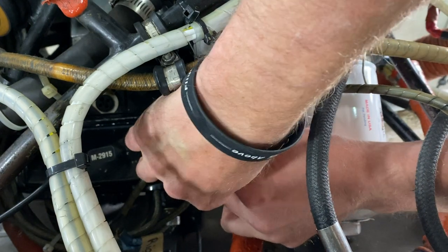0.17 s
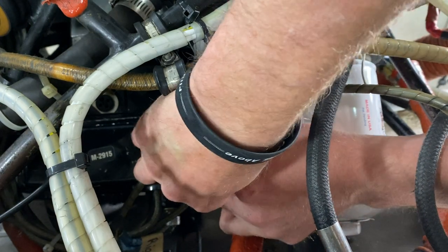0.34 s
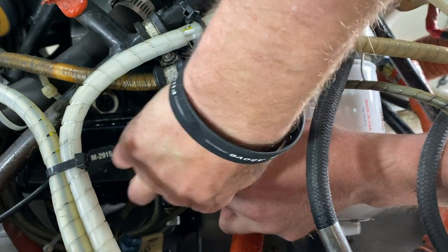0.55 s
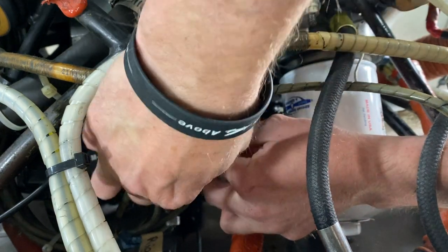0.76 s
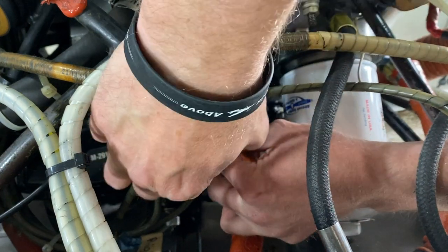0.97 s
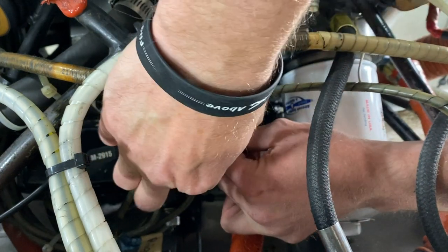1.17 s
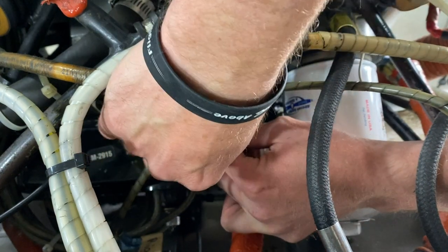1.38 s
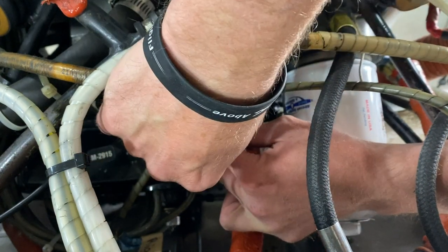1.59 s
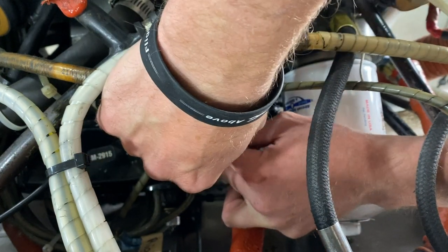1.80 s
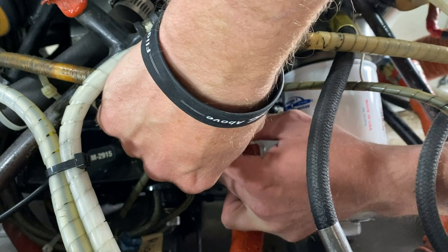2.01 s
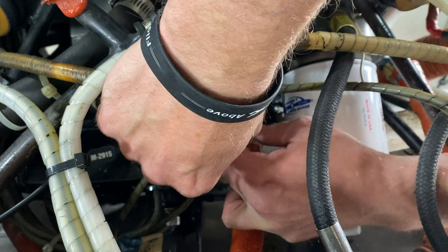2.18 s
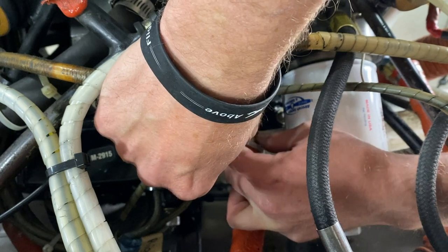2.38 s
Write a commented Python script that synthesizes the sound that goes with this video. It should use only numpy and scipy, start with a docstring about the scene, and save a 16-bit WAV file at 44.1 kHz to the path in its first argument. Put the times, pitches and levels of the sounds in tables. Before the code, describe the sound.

Zip tie pulled tight with a rapid rasp of sharp clicks, followed by soft handling sounds

```python
"""A nylon zip tie is pulled tight around a hose in an engine bay, close by, in a hangar.
Its pawl clicks over the teeth in a quick jerk, a slow stretch and a fast run: noise cracks plus ringing modes.
Fingers rub (dense random grains), tick on the plastic (cracks with a short ring), scuff (fading noise)
and knock softly on the hoses (band-passed modes). Low filtered noise and faint reverberation lie behind."""
import sys
import numpy as np
from scipy import signal
from scipy.fft import rfft, irfft, next_fast_len
from scipy.io import wavfile
from scipy.ndimage import uniform_filter1d

SR = 44100
rng = np.random.default_rng(int(sys.argv[2]) if len(sys.argv) > 2 else 0)


def store_pcm(level_fs):
    """Save levels as 16-bit WAV."""
    pcm = np.round(np.clip(level_fs, -1, 1) * 32767).astype(np.int16)
    wavfile.write(sys.argv[1], SR, np.atleast_2d(pcm).T)


N = 108045
TIME_S = np.arange(N) / SR


def from_db(db):
    """Decibels to gain."""
    return 10 ** (np.asarray(db) / 20)


def rms_one(x):
    """Scale to rms 1."""
    return x / np.sqrt(np.mean(x ** 2) + 1e-20)


def curve(rows, time_s, column=1):
    """One column of a time table, interpolated at time_s."""
    rows = np.array(rows)
    return np.interp(time_s, rows[:, 0], rows[:, column])


def colour(x, points):
    """Causal (minimum-phase) filter with the given spectrum, interpolated over log frequency."""
    size = 2 * next_fast_len(len(x))
    freq_hz, level_db = np.transpose(points)
    grid_hz = np.maximum(np.arange(size // 2 + 1) * SR / size, 1)
    gain = from_db(np.interp(np.log(grid_hz), np.log(freq_hz), level_db))
    # fold the cepstrum onto positive time
    cepstrum = irfft(np.log(gain))
    cepstrum[1:size // 2] *= 2
    cepstrum[size // 2 + 1:] = 0
    response = np.exp(rfft(cepstrum))
    return irfft(rfft(x, size) * response)[:len(x)]


def low_pass(x, cutoff_hz):
    """Second-order low-pass."""
    return signal.sosfilt(signal.butter(2, cutoff_hz, fs=SR, output="sos"), x)


def add(out, start_s, sound):
    """Mix a sound in at start_s."""
    start = int(start_s * SR)
    out[start:start + len(sound)] += sound[:max(N - start, 0)]


def dying_noise(t60_s, size=3000):
    """Dense reflections: exponential fade, flattened spectrum, taper to zero; energy 1."""
    fade = from_db(-60 * np.arange(size) / SR / t60_s)
    spectrum = rfft(rng.standard_normal(size) * fade)
    smooth_power = uniform_filter1d(np.abs(spectrum) ** 2, size=size // 70)
    flat = irfft(spectrum / np.sqrt(smooth_power + 1e-12), size)
    tail = flat * np.linspace(1, 0, size) ** 2
    return tail / np.linalg.norm(tail)


def ring(modes, spread_db, size=9000):
    """One blow on decaying sine modes of alternating sign, each level varied by chance."""
    t = np.arange(size) / SR
    out = np.zeros(size)
    for k, (freq_hz, level_db, t60_s) in enumerate(modes):
        fade = from_db(level_db + spread_db * rng.standard_normal() - 60 * t / t60_s)
        out += (-1) ** k * fade * np.sin(2 * np.pi * freq_hz * t)
    return out


AIR_RMS_DB = -58.5
# background spectrum density: freq_hz, level_db (relative, per Hz)
AIR_SPECTRUM = [(20, 5), (40, 1.5), (70, -4), (120, -12.5), (180, -11), (280, -19), (450, -24.5),
                (640, -16.5), (900, -28), (2000, -47.5), (6000, -41.5), (15000, -40.5)]


def hangar_air():
    """Steady low rumble: noise shaped by the background spectrum."""
    return from_db(AIR_RMS_DB) * rms_one(colour(rng.standard_normal(N), AIR_SPECTRUM))


HALL_T60_S, HALL_BASS_T60_S = 0.37, 0.8
# hangar return: freq_hz, level_db
HALL_SPECTRUM = [(100, -33.5), (165, -13.5), (200, -15.5), (260, -13), (1000, -18.5), (4000, -19.5),
                 (13000, -26.5)]


def hangar_reverb(x):
    """Faint diffuse return; the bass decays more slowly than the treble."""
    full = dying_noise(HALL_T60_S, size=SR)
    treble = full - low_pass(full, 370.4)
    bass = low_pass(dying_noise(HALL_BASS_T60_S, size=SR), 400)
    return signal.fftconvolve(x, colour(treble + bass, HALL_SPECTRUM))[:N]


GRAINS_PER_S, GRAIN_SPREAD_DB = 2500, 1.5
FLUTTER_RMS_DB, FLUTTER_CUTOFF_HZ = 2, 26.12
CATCHES_PER_S, CATCH_DB, CATCH_SPREAD_DB = 45, 22.5, 2.5   # impulse level before colouring and rub level
# fingers sliding on the strap: time_s, level_db
RUB_LEVEL = [(0, -66.5), (.2, -60.5), (.8, -68), (.93, -67.5), (1.05, -65), (1.2, -66), (1.35, -65.5),
             (1.52, -68), (1.58, -72.5), (1.8, -72.5), (1.88, -74), (1.97, -74), (2.15, -73.5),
             (2.27, -68.5), (2.45, -69.5)]
# slip grain spectrum: freq_hz, level_db (relative)
RUB_SPECTRUM = [(400, 9), (900, -1.5), (1500, 7), (2200, 2.5), (3100, 5), (5000, -4), (9000, -10.5),
                (15000, -23.5)]


def rubbing():
    """Skin slips on the strap in fine random grains and at times catches with a faint tick."""
    born = rng.random(N) < GRAINS_PER_S / SR
    grain_db = GRAIN_SPREAD_DB * np.minimum(rng.exponential(1, N), 5)
    grains = born * rng.choice([-1, 1], N) * from_db(grain_db)
    flutter = rms_one(low_pass(rng.standard_normal(N), FLUTTER_CUTOFF_HZ))
    caught = rng.random(N) < CATCHES_PER_S / SR
    catches = caught * from_db(CATCH_DB + CATCH_SPREAD_DB * rng.uniform(-1.3, 1, N))
    slip = rms_one(colour(grains, RUB_SPECTRUM)) + colour(catches, TICK_SPECTRUM)
    return slip * from_db(curve(RUB_LEVEL, TIME_S) + FLUTTER_RMS_DB * flutter)


# skin scuffs across a hose: start_s, level_db, t60_s
SCUFF_EVENTS = [(0.129, -23, 0.082), (1.863, -26, 0.083), (1.873, -24.5, 0.055), (1.883, -18.5, 0.12)]
# scuff spectrum: freq_hz, level_db
SCUFF_SPECTRUM = [(30, 16), (70, 19), (130, 3.5), (400, 14.5), (1100, -3), (2000, -9.5), (4000, -14),
                  (9000, -18.5), (15000, -22.5)]


def scuffs():
    """Skin friction as short broad bursts of fading noise with a soft low push."""
    out = np.zeros(N)
    for start_s, level_db, t60_s in SCUFF_EVENTS:
        add(out, start_s, from_db(level_db) * dying_noise(t60_s))
    return colour(out, SCUFF_SPECTRUM)


BAND_RATIO = 1.47   # favoured pitch to each band edge
SLIDE_SHARE, SKIN_CUTOFF_HZ = 0.73, 900   # energy share of the push that slides; soft skin dulls the contact
# knuckles on the hoses: start_s, level_db, favoured_hz, slide_t60_s
BUMP_EVENTS = [(.131, -35, 340, 0.026), (0.148, -5.5, 272, 0.0088), (0.514, 8.5, 167, 0.011),
               (1.141, -5, 688, 0.06), (1.169, -12, 400, 0.047), (1.247, -9.5, 190, 0.043),
               (1.318, -14, 620, 0.044), (1.337, -9, 206, 0.043), (1.445, -10, 400, 0.11),
               (1.612, -7, 642, 0.042), (1.8392, 8, 400, 0.005), (1.886, -1, 228, 0.011),
               (1.895, -5.5, 435, 0.047), (1.915, -11, 700, .04), (2.249, -5.5, 670, 0.045),
               (2.348, -11, 172, .04)]
# hose modes: freq_hz, level_db, t60_s
HOSE_MODES = [(181.4, -40, 0.1), (282, -46.5, .05), (399, -44.5, 0.031), (523, -43.5, 0.02),
              (585, -44, 0.066), (672, -41.5, 0.055), (1096, -57.5, 0.017)]


def bumps():
    """Soft contacts push and slide, ringing the hoses briefly, each favouring one band of modes."""
    out = np.zeros(N)
    for start_s, level_db, favoured_hz, t60_s in BUMP_EVENTS:
        push = np.sqrt(SLIDE_SHARE) * dying_noise(t60_s)
        push[0] += np.sqrt(1 - SLIDE_SHARE)
        hose = signal.fftconvolve(push, ring(HOSE_MODES, spread_db=2.5))
        band_hz = [favoured_hz / BAND_RATIO, favoured_hz * BAND_RATIO]
        contact = signal.butter(1, band_hz, "band", fs=SR, output="sos")
        add(out, start_s, from_db(level_db) * signal.sosfilt(contact, hose))
    return low_pass(out, SKIN_CUTOFF_HZ)


TICK_DB, TICK_T60_S, TICK_DIRECT_DB = -21.5, 0.015, 4.5
TICK_RING_DB, TICK_RING_T60_S = -13.5, 0.0054
# ticks of the plastic tail: start_s, level_db, ring_hz, cutoff_hz
TICK_EVENTS = [(0.068, -16.5, 9300, 11700), (0.1552, -17, 5300, 9000), (.2000, -9, 3030, 8850),
               (1.023, -22.5, 8500, 11000), (1.2239, -2.5, 5490, 6200), (1.236, -24, 5000, 9000),
               (1.288, -7, 3580, 7650), (1.3080, -14, 3600, 8800), (1.351, -9.5, 2800, 7400),
               (1.5236, -2.5, 3290, 13700), (1.539, -19, 5030, 10000), (2.0679, -6.5, 4430, 8100),
               (2.2693, -15, 3150, 12000), (2.346, -16.5, 7040, 13000), (2.4437, -13.5, 3350, 9800)]
# tick spectrum: freq_hz, level_db
TICK_SPECTRUM = [(600, -26), (1000, -18.5), (1500, 0.5), (2300, -8), (3100, 1), (4500, -3), (6000, -2.5),
                 (8200, -0.5), (10500, -9), (15000, -16)]


def ticks():
    """Nylon on fingernails and fittings: a crack, a very short ring and a little scatter."""
    out = np.zeros(N)
    for start_s, level_db, ring_hz, cutoff_hz in TICK_EVENTS:
        mode = (ring_hz, TICK_RING_DB, TICK_RING_T60_S)
        click = dying_noise(TICK_T60_S) + ring([mode], spread_db=3, size=3000)
        click[0] += from_db(TICK_DIRECT_DB)
        add(out, start_s, from_db(TICK_DB + level_db) * low_pass(click, cutoff_hz))
    return colour(out, TICK_SPECTRUM)


TOOTH_CHANGE = 0.65   # energy share of the scatter that differs from tooth to tooth


def tooth_clicks(times_s, levels_db, t60_s, direct_db):
    """Each tooth gives a sharp crack, then scatter off the engine parts, partly alike each time."""
    out = np.zeros(N)
    shared = dying_noise(t60_s)
    for start_s, level_db in zip(times_s, levels_db):
        click = np.sqrt(1 - TOOTH_CHANGE) * shared + np.sqrt(TOOTH_CHANGE) * dying_noise(t60_s)
        click[0] += from_db(direct_db)
        add(out, start_s, from_db(level_db) * click)
    return out


SNAP_DB, SNAP_T60_S, SNAP_DIRECT_DB = 2, 0.025, -5.5
CLACK_DB, CLACK_T60_S, CLACK_DIRECT_DB = -15.5, 0.043, -13.5
PAWL_HZ, PAWL_T60_S = 14000, .0025
TOOTH_SPREAD_DB, MODE_SPREAD_DB = -0.73, 3.55   # factors on a normal draw
# strap drawn through the head: time_s, teeth_passed
STRAP_TRAVEL = [(0.2386, 0), (0.2657, 9), (0.2728, 10), (0.2861, 11), (0.3116, 14), (0.3548, 17),
                (0.3659, 18), (0.4286, 22), (0.4569, 24), (0.4806, 26), (0.5516, 33), (0.6069, 37),
                (0.6367, 41), (0.6582, 45), (0.697, 53), (0.7138, 56), (0.7287, 58), (0.7502, 60)]
# tooth strength: time_s, snap_db, clack_db, hum_db, knock_db, twang_db
TOOTH_STRENGTH = [(.238, 2, 7, 6.5, -3, -14), (.257, -5.5, -5, -6, -1.5, -12), (.278, 0, 2.5, 6.5, 4.5, -3),
                  (.32, 1, 2, 5, 7.5, -5), (.37, 1.5, 1.5, 0, 4, -3), (.42, 0, 4, 4.5, 4, 2.5),
                  (.485, -0.5, 0, 2, 4.5, 10.5), (.517, -1, -2, 4, 7, 10), (.56, -3, 1.5, -14, 0, 4),
                  (.615, -3.5, 3, 7.5, -11, -6), (.66, -4, 3.5, 6, -2, 5.5), (.71, -6, 2.5, 5, -4, 5),
                  (.75, -4.5, 3.5, -0.5, -6.5, 5.5)]
# bright pawl snap: freq_hz, level_db
SNAP_SPECTRUM = [(3000, -36), (6000, -15), (7200, -12.5), (8000, -7), (9000, -7), (9600, -6), (10200, -9.5),
                 (11400, -5.5), (12300, -0.5), (13400, 0), (14600, -3), (15600, 1.5), (16500, -25)]
# duller strap clack: freq_hz, level_db
CLACK_SPECTRUM = [(500, -34.5), (1100, -2), (1700, -7), (2400, -5), (2900, -4.5), (4000, -4.5), (4700, -3),
                  (6200, 0), (8500, -18), (14000, 1)]
# the pawl's own ring, hardest in the first jerk: time_s, level_db
PAWL_LEVEL = [(.238, -24.5), (.248, -14.5), (.257, -6), (.264, -10), (.275, -34), (.75, -50.5)]
# tied bundle's low hum: freq_hz, level_db, t60_s
HUM_MODES = [(165.8, -50.5, 0.17), (200.8, -47, 0.088), (307, -51, 0.093), (397, -54.5, 0.036)]
# lock head's hollow knock: freq_hz, level_db, t60_s
KNOCK_MODES = [(508, -54.5, 0.051), (545, -50.5, 0.066), (640.6, -51, 0.091), (750, -48, 0.047),
               (1058, -55, 0.061)]
# taut strap's twang: freq_hz, level_db, t60_s
TWANG_MODES = [(1550, -58, 0.11), (1935, -53.5, 0.043), (2034, -56.5, 0.032), (2566, -60, 0.027),
               (4240, -59, 0.025)]


def ratchet():
    """The pawl drops at each tooth: it rings and snaps, strap and head sound, the bundle gets a kick."""
    travel_s, teeth = np.transpose(STRAP_TRAVEL)
    times_s = np.interp(np.arange(teeth[-1] + 1), teeth, travel_s)
    uneven_db = TOOTH_SPREAD_DB * rng.standard_normal(len(times_s))
    snap_db = SNAP_DB + curve(TOOTH_STRENGTH, times_s, column=1) + uneven_db
    clack_db = CLACK_DB + curve(TOOTH_STRENGTH, times_s, column=2) + uneven_db
    snap = tooth_clicks(times_s, snap_db, SNAP_T60_S, SNAP_DIRECT_DB)
    clack = tooth_clicks(times_s, clack_db, CLACK_T60_S, CLACK_DIRECT_DB)
    body = np.zeros(N)
    # modes, strength column, length in samples
    resonators = [(HUM_MODES, 3, 6000), (KNOCK_MODES, 4, 4000), (TWANG_MODES, 5, 2500)]
    for start_s in times_s:
        pawl_mode = (PAWL_HZ, curve(PAWL_LEVEL, start_s), PAWL_T60_S)
        add(body, start_s, ring([pawl_mode], TOOTH_SPREAD_DB, size=500))
        for modes, column, size in resonators:
            gain = from_db(curve(TOOTH_STRENGTH, start_s, column))
            add(body, start_s, gain * ring(modes, MODE_SPREAD_DB, size))
    return colour(snap, SNAP_SPECTRUM) + colour(clack, CLACK_SPECTRUM) + body


def scene():
    """Tie and hands close by, with their reverberation, over the hangar's low rumble."""
    near = ratchet() + ticks() + bumps() + scuffs() + rubbing()
    return (near + hangar_reverb(near) + hangar_air())[None]


CUTOFF_HZ = 16000


def record(dry):
    """Steep elliptic low-pass cuts the top."""
    return signal.sosfilt(signal.ellip(10, .2, 70, CUTOFF_HZ, fs=SR, output="sos"), dry)


dry = scene()
out = record(dry)
store_pcm(out)
```